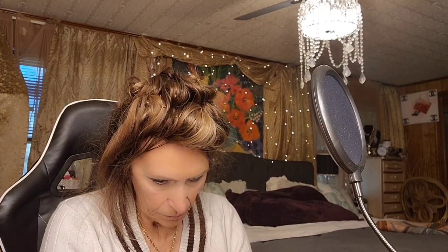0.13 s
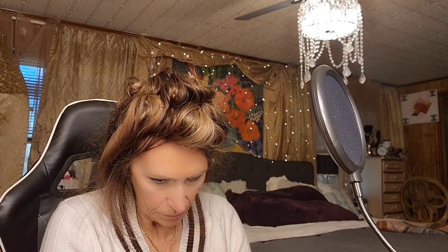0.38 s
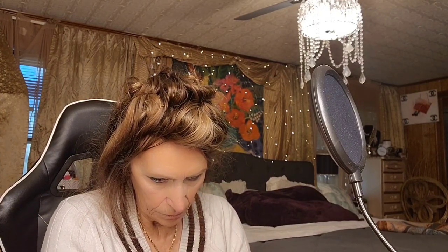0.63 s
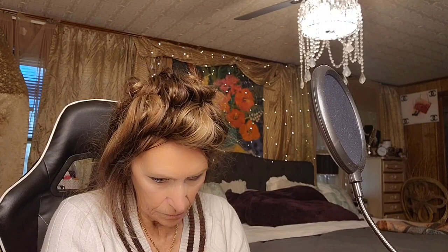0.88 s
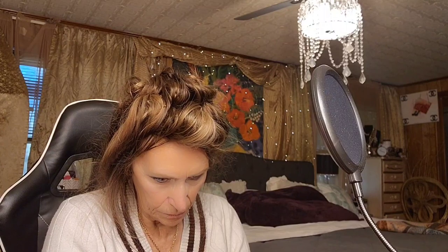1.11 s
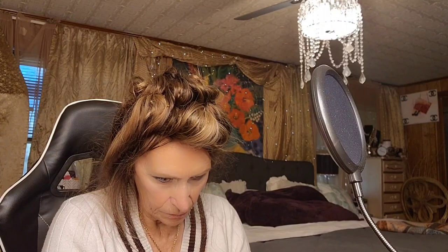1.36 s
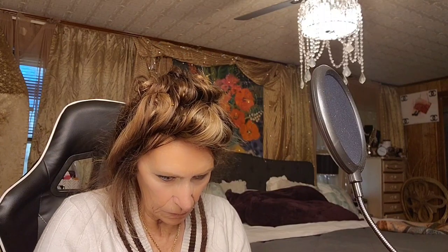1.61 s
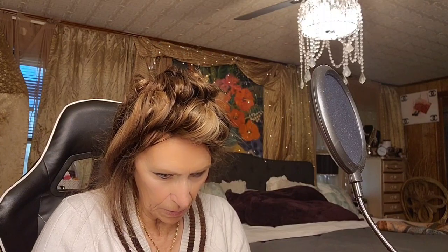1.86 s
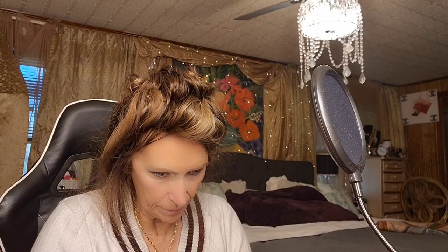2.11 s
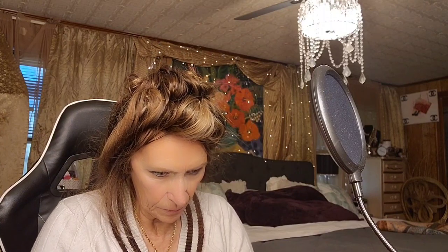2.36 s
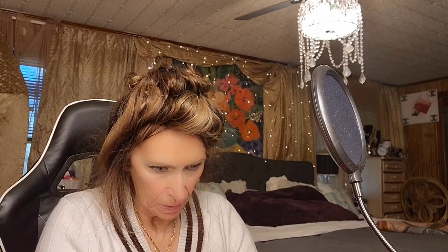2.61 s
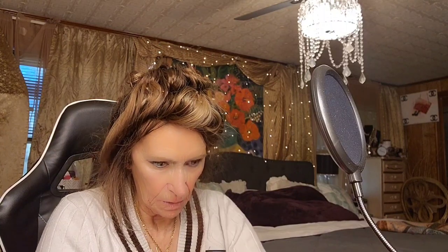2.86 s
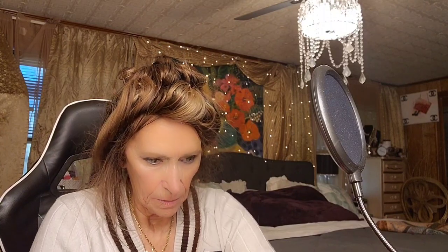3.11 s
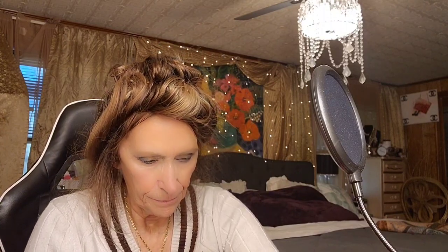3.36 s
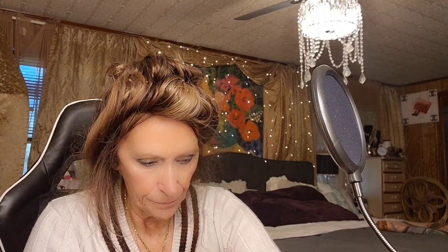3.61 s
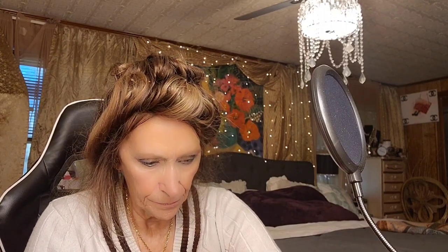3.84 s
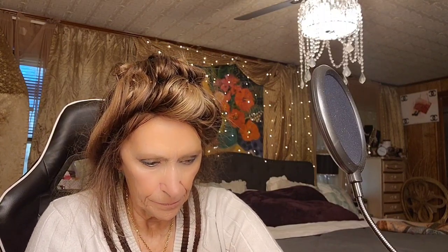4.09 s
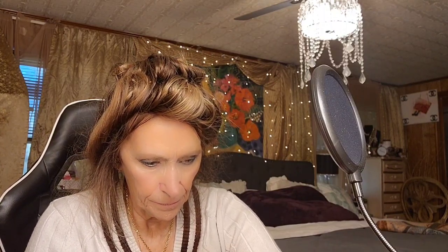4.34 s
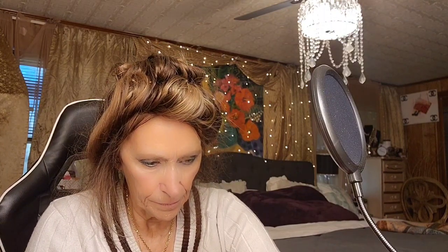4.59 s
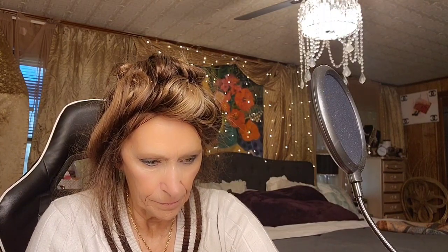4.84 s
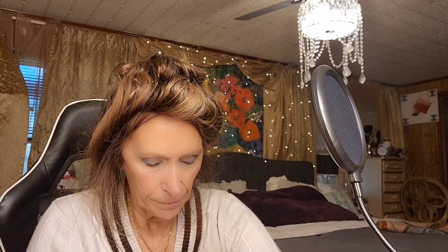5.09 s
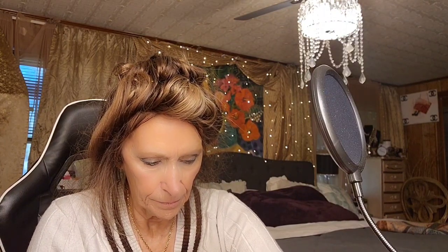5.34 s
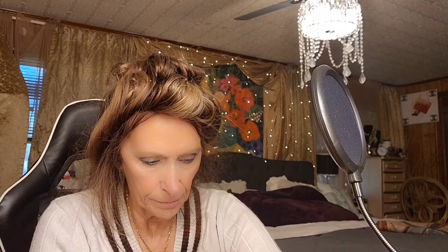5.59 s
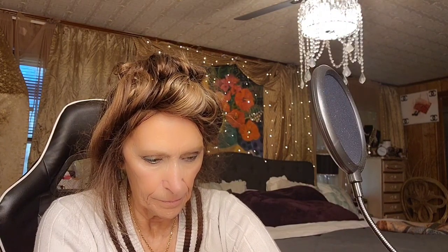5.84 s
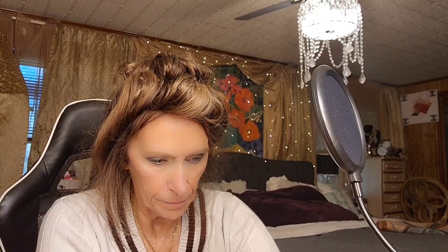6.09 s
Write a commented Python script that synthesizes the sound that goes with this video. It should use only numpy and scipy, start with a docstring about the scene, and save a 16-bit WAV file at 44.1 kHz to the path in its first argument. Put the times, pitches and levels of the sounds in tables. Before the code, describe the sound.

Close light plastic clicks and rattles on a desktop, a sharp compact-like knock midway, then dull low thumps through the microphone arm over faint hiss.

```python
"""Small plastic cases are shuffled, tapped and set down on a wooden desk, as chattering knocks through resonances.
The place is a soft furnished room, its short tail made of decaying noise; the microphone is close enough
for the direct sound to lead, and its capsules sit close together.
Hands bumping the desk shake the microphone arm, whose two swings near 90 Hz beat briefly.
Below lie preamp hiss and a room rumble, both shaped noise."""
import sys
import numpy as np
from scipy import signal
from scipy.fft import rfft, irfft
from scipy.io import wavfile
from scipy.ndimage import uniform_filter1d

SR = 44100
rng = np.random.default_rng(int(sys.argv[2]) if len(sys.argv) > 2 else 0)


def ratio_of_db(decibels):
    """Turn decibels (scalar or array-like) into linear amplitude factors; 0 dB maps to 1."""
    return 10 ** (np.asarray(decibels, float) / 20)


def int16_out(signal):
    """Quantize to a 16-bit WAV file."""
    q = np.round(np.clip(np.atleast_2d(signal).T, -1, 1) * 32767)
    wavfile.write(sys.argv[1], SR, q.astype(np.int16))


N = 273855   # samples


def rms_one(x):
    """Scale to rms 1."""
    return x / np.sqrt(np.mean(x ** 2) + 1e-20)


def peak_one(x):
    """Scale to peak 1."""
    return x / np.abs(x).max()


def add(out, s, sound):
    """Mix a sound in at a time in seconds."""
    at = round(s * SR)
    out[at:at + len(sound)] += sound[:N - at]


def shaped(x, points):
    """Filter noise by a curve of (frequency [Hz], level [dB]) points, straight over log frequency."""
    hz, db = np.transpose(points)
    grid = np.log(np.arange(N // 2 + 1) * SR / N + 1)
    return irfft(rfft(x) * ratio_of_db(np.interp(grid, np.log(hz), db)), N)


def drift(rate_hz):
    """Random wander of rms 1: white noise through two equal low-pass poles."""
    r = np.exp(-2 * np.pi * rate_hz / SR)
    wander = signal.lfilter([1], [1, -2 * r, r * r], rng.standard_normal(N + SR))
    return rms_one(wander[SR:])   # the first second lets the filter settle


def resonance(x, hz, width_hz):
    """Two-pole resonance with gain 1 on top."""
    r = np.exp(-np.pi * width_hz / SR)
    feedback = [1, -2 * r * np.cos(2 * np.pi * hz / SR), r * r]
    return signal.lfilter([(1 - r * r) / 2, 0, (r * r - 1) / 2], feedback, x)


def chatter(t60, lumps_db, first_db):
    """A firm first knock, then a quarter second of uneven micro-knocks that die away."""
    t = np.arange(SR // 4) / SR
    knocks = rng.standard_normal(len(t)) * ratio_of_db(lumps_db * np.minimum(rng.exponential(1, len(t)), 4))
    knocks[0] = ratio_of_db(first_db)
    return knocks * ratio_of_db(-60 * t / np.clip(t60, .004, .3))


# chatter length at a firm contact; it halves 0.1555 times per dB above that level
CHATTER_T60_S, FIRM_DB, HALVES_PER_DB = 0.061, -39.5, 0.1555
# clear contacts of the cases at the desk:
# (time [s], main ring peak level [dB], main ring [Hz], body peak level [dB], treble level [dB])
CONTACTS = [(0.159, -53, 1490, -46.5, -73), (0.234, -42, 1070, -47, -32.5),
            (0.241, -39.5, 2030, -47, -35.5), (0.262, -50, 1050, -41, -38), (0.282, -50, 1820, -46, -43),
            (0.354, -50, 455, -47, -50), (0.377, -35.5, 930, -39.5, -39), (0.386, -34.5, 870, -44, -58),
            (0.654, -52, 1450, -65, -68), (0.674, -38.5, 1340, -30, -36.5),
            (0.681, -35.5, 1300, -35.5, -44), (0.771, -45, 532, -39.5, -60), (1.033, -40, 1970, -35, -50),
            (1.048, -37, 2920, -49, -37), (1.067, -39, 1950, -35, -35), (1.073, -33, 1120, -26.5, -55),
            (1.1, -46, 2440, -34, -37.5), (1.107, -32, 1900, -36, -60), (1.146, -33, 915, -43, -36),
            (1.165, -38, 593, -27.5, -30.5), (1.175, -36, 1240, -33, -51), (1.188, -46, 688, -39, -26.5),
            (1.223, -43, 930, -43, -45), (1.278, -43.5, 970, -56, -66), (1.305, -46, 1136, -45, -43.5),
            (1.312, -47, 530, -35, -57), (1.347, -38.5, 460, -39.5, -47), (1.435, -58, 462, -52, -58),
            (1.598, -56.5, 1050, -52.5, -70), (1.82, -51.5, 970, -54, -72), (1.857, -52, 517, -55, -70),
            (1.989, -51, 2530, -61, -44), (2.719, -43, 460, -39.5, -39), (2.733, -39.5, 1060, -39, -44),
            (3.546, -48, 464, -48.5, -50), (3.784, -62, 451, -62, -52), (3.936, -60, 745, -59, -70),
            (4.034, -36, 714, -36, -58), (4.048, -45, 826, -42, -55), (4.096, -63, 1240, -60, -68),
            (4.289, -48, 770, -42, -63), (4.323, -55, 770, -42.5, -36.5), (4.478, -49, 3000, -46.5, -48),
            (4.524, -65, 820, -49, -50), (4.703, -46, 520, -43, -60), (5.269, -52, 1850, -47, -50),
            (5.881, -57, 2320, -57, -70), (5.943, -63, 950, -46.5, -64), (6.067, -49.5, 3000, -49.5, -48),
            (6.077, -56, 935, -47, -65)]
# resonances of the plastic cases, for taps and shuffle: (frequency [Hz], width before widening [Hz], level [dB])
CASE_MODES = [(517, 84, 2), (930, 155, 3.5), (1490, 22, -27), (1935, 360, -9), (2270, 29, -12),
              (3000, 10.7, -3.5), (3300, 160, 11.5), (4160, 130, -31), (4690, 280, 12.5), (6260, 750, -14),
              (7440, 92, -58), (8150, 700, -3.5)]


def taps(ring_q=3.3, crack_share=0.079, widen=5.3, body_cut_hz=4500, air_cut_hz=10500):
    """Each contact chatters into one main ring, the case resonances and a bright crack; harder ones seat faster."""
    out = np.zeros(N)
    crack_band = signal.butter(2, [3300, 9000], "band", fs=SR, output="sos")
    body_filter = signal.butter(2, body_cut_hz, fs=SR, output="sos")
    air_filter = signal.butter(2, air_cut_hz, fs=SR, output="sos")
    for s, ring_db, hz, body_db, treble_db in CONTACTS:
        firmer_db = max(ring_db, body_db, treble_db) - FIRM_DB
        t60 = CHATTER_T60_S * 2 ** (-HALVES_PER_DB * firmer_db)
        knocks = chatter(t60, lumps_db=4.0, first_db=13.0)
        strengths = ratio_of_db(rng.normal(0, 4.1, len(CASE_MODES)))   # each blow lands on another spot
        body, bright = np.zeros(len(knocks)), np.zeros(len(knocks))
        for strength, (f, width, db) in zip(strengths, CASE_MODES):
            mode = strength * ratio_of_db(db) * resonance(knocks, f, widen * width)
            if f >= 3300:
                bright += mode
            elif f > 800:
                body += mode
        body = signal.sosfilt(body_filter, body)
        bright = signal.sosfilt(air_filter, bright)
        crack = signal.sosfilt(crack_band, knocks)
        treble = crack_share * peak_one(crack) + (1 - crack_share) * peak_one(bright)
        # twice through the resonance, for steep skirts
        ring = resonance(resonance(knocks, hz, hz / ring_q), hz, 2 * hz / ring_q)
        add(out, s, ratio_of_db(ring_db) * peak_one(ring) + ratio_of_db(body_db) * peak_one(body) + ratio_of_db(treble_db) * treble)
    return out


KNOCK_ATTACK_S = 0.0012   # the broad base seats over a moment
# a hollow compact touches down, is knocked down hard and rebounds: (time [s], peak level of the rings [dB])
COMPACT_BLOWS = [(2.6815, -46), (2.6898, -20.5), (2.6975, -28)]
# modes of the hollow compact: (frequency [Hz], relative level [dB], t60 [s])
COMPACT_MODES = [(510, 0, .048), (600, -12, .045), (1070, -4, .03), (1310, -14, .04), (3750, -24, .015),
                 (5300, -20, .012), (6100, -18, .012)]


def knock(crack_db=-12.5):
    """Every blow sets all modes of the compact ringing at once, under a short broad crack."""
    out, t = np.zeros(N), np.arange(SR // 4) / SR
    for s, db in COMPACT_BLOWS:
        spots = ratio_of_db(rng.normal(0, 0.82, len(COMPACT_MODES)))   # uneven blow, spread in dB
        rings = np.zeros(len(t))
        for spot, (f, mode_db, t60) in zip(spots, COMPACT_MODES):
            rings += spot * ratio_of_db(mode_db - 60 * t / t60) * np.sin(2 * np.pi * f * t)
        rings *= 1 - np.exp(-t / KNOCK_ATTACK_S)
        crack = resonance(chatter(0.018, lumps_db=4.0, first_db=5.0), 5500, 7600)
        add(out, s, ratio_of_db(db) * (peak_one(rings) + ratio_of_db(crack_db) * peak_one(crack)))
    return out


DESK_T60_S = 0.05
# cases landing on the desk top: (time [s], peak level [dB], desk note [Hz])
LANDINGS = [(0.158, -53, 252), (0.233, -44.5, 232), (0.282, -46, 257), (0.376, -43, 390), (0.681, -47, 151),
            (0.771, -52.5, 264), (1.075, -44, 400), (1.211, -52, 262), (1.313, -39, 219), (1.347, -32, 242),
            (1.437, -46, 180), (1.856, -55.5, 231), (2.72, -39, 204), (3.551, -45.5, 151),
            (3.579, -43.5, 229), (3.78, -50.5, 150), (4.287, -48.5, 152), (4.478, -62, 160),
            (4.7, -44.5, 282), (4.76, -49.5, 208)]


def thuds(soft_hz=500):
    """A short soft push sets the desk top ringing on one low note."""
    out, soft = np.zeros(N), signal.butter(2, soft_hz, fs=SR, output="sos")
    width_hz = np.log(1000) / np.pi / DESK_T60_S   # a ring this wide falls 60 dB in the t60
    for s, db, hz in LANDINGS:
        push = signal.sosfilt(soft, chatter(0.035, lumps_db=3.0, first_db=17.0))
        add(out, s, ratio_of_db(db) * peak_one(resonance(push, hz, width_hz)))
    return out


# thin caps snapping: (time [s], peak level [dB], ring [Hz])
CAP_SNAPS = [(1.05, -32.5, 4690), (1.189, -33.5, 7170), (1.306, -34.5, 6460), (1.957, -41, 5700)]


def ticks():
    """A thin cap gives a very short high ring."""
    out = np.zeros(N)
    for s, db, hz in CAP_SNAPS:
        snap = chatter(.015, lumps_db=1.5, first_db=10.0)
        ring = resonance(resonance(snap, hz, 900), hz, 1800)
        add(out, s, ratio_of_db(db) * peak_one(ring))
    return out


# spectrum of the sliding before the case resonances: (frequency [Hz], relative level per Hz [dB])
SLIDE_COLOUR = [(71, -44), (120, -14), (330, -11), (474, -3), (802, -7), (923, -2), (1800, -8), (8350, -19),
                (15000, -36)]


def shuffle(per_s=6000.0, sizes_db=2.5, clump_db=4.0, modes_db=-3.0):
    """Sliding is a dense clumped hail of tiny clicks, heard plain and through the widened case resonances."""
    born = rng.random(N) < per_s / SR
    sizes = sizes_db * np.minimum(rng.exponential(1, N), 4)
    clumps = clump_db * drift(46.0)
    clicks = born * ratio_of_db(sizes + clumps) * rng.choice([-1, 1], N)
    broad = rms_one(shaped(clicks, SLIDE_COLOUR))
    rung = sum(resonance(broad, f, 7.6 * width) for f, width, _ in CASE_MODES)
    return rms_one(broad + ratio_of_db(modes_db) * rung) * sliding()


# share of a slide spent rising; start and end levels against its top
SLIDE_RISE_SHARE, SLIDE_START_DB, SLIDE_END_DB = 0.3, -5, -16
# cases sliding against each other: (start time [s], length [s], top rms level [dB])
SLIDE_MOVES = [(0.11, 0.12, -62), (0.23, 0.2, -48), (0.34, 0.12, -60.5), (0.67, 0.2, -59),
               (1.03, 0.12, -44), (1.143, 0.15, -44), (1.3, 0.18, -59), (2.715, 0.08, -54),
               (4.285, 0.1, -61), (4.475, 0.12, -62), (6.05, 0.1, -63)]


def sliding():
    """Gain of the slides: each swells to its top and fades, straight in dB, then smoothed over 10 ms."""
    t, out = np.arange(N) / SR, np.zeros(N)
    for s, length, db in SLIDE_MOVES:
        corners = s + length * np.array([0, SLIDE_RISE_SHARE, 1])
        inside = (t >= s) & (t < s + length)
        out += inside * ratio_of_db(db + np.interp(t, corners, [SLIDE_START_DB, 0, SLIDE_END_DB]))
    return uniform_filter1d(out, size=SR // 100)


ROOM_T60_S, ROOM_DB, WALL_CUT_HZ = 0.18, -9.5, 12400   # level: tail against direct sound


def room(x, apart_db=-47.0):
    """Dense echoes from 4 ms on; the treble dies twice as fast in the soft furnishing."""
    t = np.arange(SR // 2) / SR
    split = signal.butter(1, WALL_CUT_HZ, fs=SR, output="sos")
    white = rng.standard_normal((2, len(t))) * (t > .004)
    low = signal.sosfilt(split, white)
    tail = low * ratio_of_db(-60 * t / ROOM_T60_S) + (white - low) * ratio_of_db(-120 * t / ROOM_T60_S)
    tail = tail / np.sqrt(np.sum(tail[0] ** 2))
    shared, apart = tail * ratio_of_db(np.array([[0], [apart_db]]))   # capsules close together
    echoes = np.array([shared + apart, shared - apart])
    return signal.fftconvolve(x[None], echoes)[:, :N]


ARM_HZ, ARM_ATTACK_S = (97.17, 84.8), 0.023   # upper and lower swing of the microphone arm
ARM_SHAKE_DB = -9   # sliding cases shake the arm, against the slide level
# hands bump the desk: (time [s], upper swing level [dB], lower swing level [dB], t60 [s]),
# levels before the attack and decay
DESK_BUMPS = [(0.367, -46, -55, 0.23), (0.664, -54, -58, 0.3), (0.759, -48.5, -60, 0.29),
              (1.06, -57, -47, 0.13), (1.432, -29.5, -48, 0.074), (2.677, -58, -47.5, 0.3),
              (3.549, -23.5, -27.7, 0.29), (3.727, -44, -45, 0.29), (3.785, -17.5, -26.5, 0.31),
              (4.255, -36, -34, 0.34), (4.307, -49, -27, 0.17), (4.413, -60, -48, 0.28),
              (4.471, -40.5, -30, 0.5), (4.706, -20.5, -28, 0.2), (4.852, -51, -40, 0.5),
              (4.906, -30, -42, 0.19), (5.27, -36, -38, 0.13), (5.369, -46.8, -53, 0.29),
              (6.068, -41, -43, 0.3)]


def arm(overtone_db=-29.5, rattle_db=-18.0):
    """Each bump starts both swings, opposed so they beat, with a weak overtone and rough skirt; slides shake them."""
    out, t = np.zeros(N), np.arange(SR // 2) / SR
    skirt = resonance(rng.standard_normal(N + SR), 67, 107)
    skirt = rms_one(resonance(skirt, 67, 107))
    upper, lower = (np.sin(2 * np.pi * hz * t) + ratio_of_db(overtone_db) * np.sin(2.4 * 2 * np.pi * hz * t)
                    for hz in ARM_HZ)
    for s, upper_db, lower_db, t60 in DESK_BUMPS:
        rough = ratio_of_db(rattle_db + max(upper_db, lower_db)) * skirt[round(s * SR):][:len(t)]
        shape = (1 - np.exp(-t / ARM_ATTACK_S)) * ratio_of_db(-60 * t / t60)
        add(out, s, shape * (ratio_of_db(upper_db) * upper - ratio_of_db(lower_db) * lower + rough))
    shaken = sum(resonance(rng.standard_normal(N), hz, 14.0) for hz in ARM_HZ)
    return out + ratio_of_db(ARM_SHAKE_DB) * rms_one(shaken) * sliding()


HISS_DB, RUMBLE_DB = -65.5, -68.5   # rms of the part shared by both channels
# preamp hiss: (frequency [Hz], relative level per Hz [dB])
HISS_COLOUR = [(710, -39), (1200, -5), (1640, -3), (2060, -6.5), (2430, -5), (3220, -0.5), (3660, 0),
               (6370, -0.5), (8170, -5.5), (9310, -2), (12100, -6), (15200, -2), (16000, -20.5)]
# room tone: (frequency [Hz], relative level per Hz [dB])
RUMBLE_COLOUR = [(18, -53), (30, -10.5), (81, -3), (194, -16), (227, -17), (273, -15), (360, -18.5),
                 (1200, -22), (1560, -66), (2640, -120)]
# difference between the channels: (frequency [Hz], side minus mid level [dB])
SIDE_COLOUR = [(60, -41), (500, -26), (2000, -34.5), (6000, -23.5), (15000, -12.5)]


def hiss(flicker_db=2.5):
    """Steady preamp hiss over a room rumble that flickers below 150 Hz, nearly the same in both channels."""
    preamp = rms_one(shaped(rng.standard_normal(N), HISS_COLOUR))
    rumble = shaped(rng.standard_normal(N), RUMBLE_COLOUR)
    deep = signal.sosfilt(signal.butter(2, 150, fs=SR, output="sos"), rumble)
    flicker = ratio_of_db(flicker_db * drift(2.2))
    rumble = rms_one(rumble + deep * (flicker - 1))
    mid = ratio_of_db(HISS_DB) * preamp + ratio_of_db(RUMBLE_DB) * rumble
    side = shaped(np.roll(mid, SR), SIDE_COLOUR)   # an unrelated stretch of the same noise
    return np.array([mid + side, mid - side])


LEFT_OVER_RIGHT_DB = 0.5   # a small fixed level offset between the channels, left minus right


def scene():
    """Cases on the desk in the room, arm hum and hiss straight into the microphone."""
    cases = taps() + knock() + thuds() + ticks() + shuffle()
    pan = ratio_of_db(np.array([[LEFT_OVER_RIGHT_DB / 2], [-LEFT_OVER_RIGHT_DB / 2]]))
    return (cases + ratio_of_db(ROOM_DB) * room(cases)) * pan + arm() + hiss()


def band_limit(x):
    """A steep low-pass at the top of the band."""
    return signal.sosfilt(signal.butter(12, 16630, fs=SR, output="sos"), x)


def record(dry):
    """Pass on the finished mix of desk, arm and hiss."""
    return band_limit(dry)


dry = scene()
out = record(dry)
int16_out(out)
```